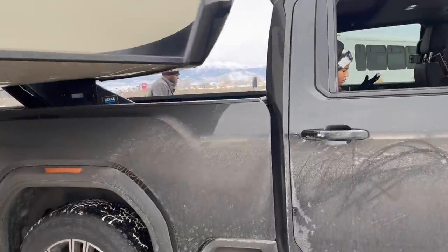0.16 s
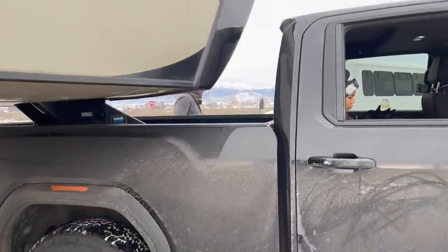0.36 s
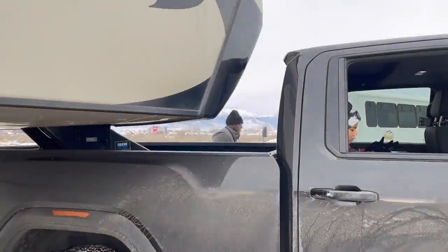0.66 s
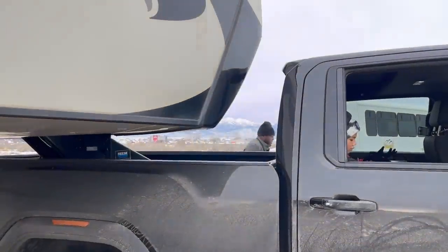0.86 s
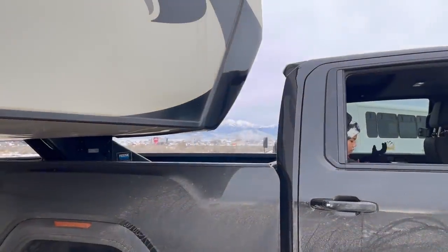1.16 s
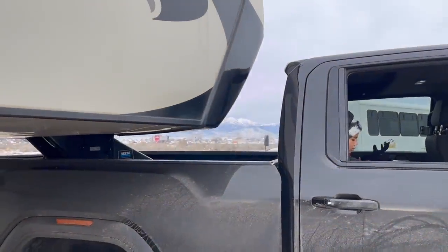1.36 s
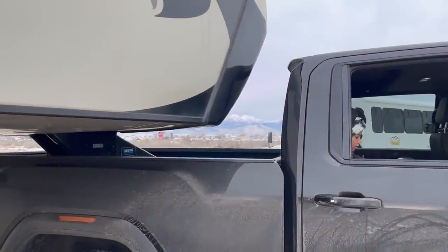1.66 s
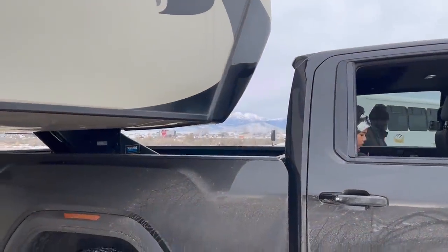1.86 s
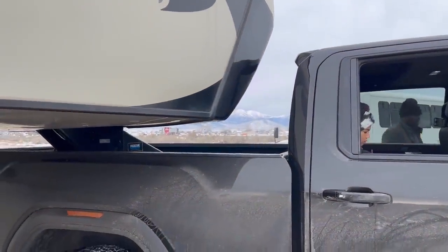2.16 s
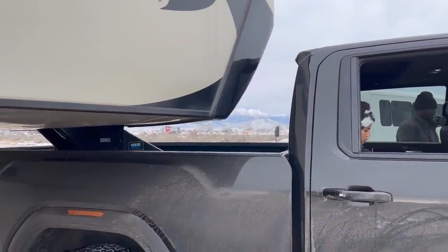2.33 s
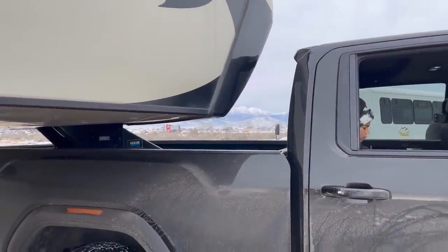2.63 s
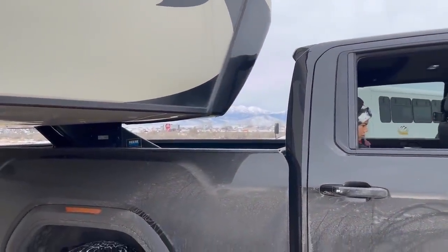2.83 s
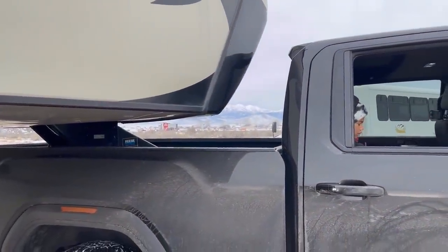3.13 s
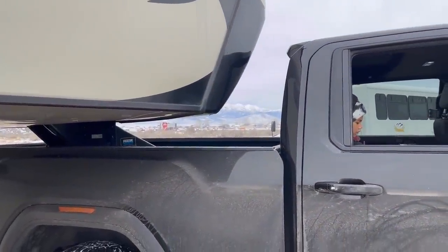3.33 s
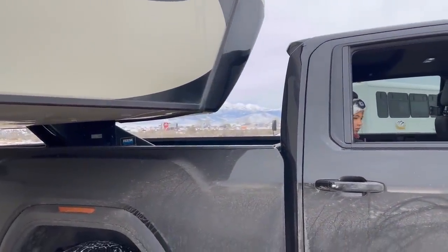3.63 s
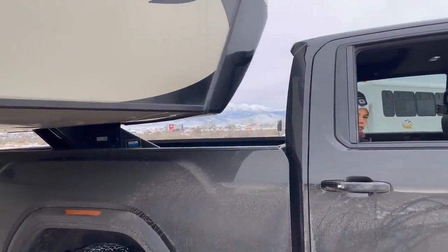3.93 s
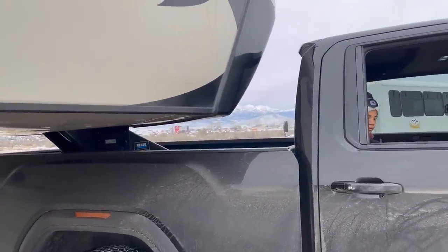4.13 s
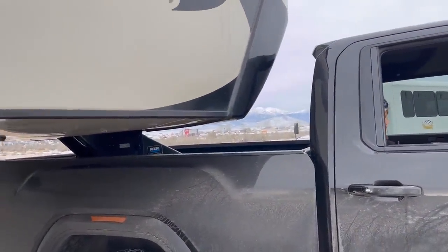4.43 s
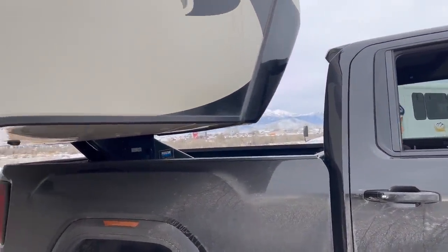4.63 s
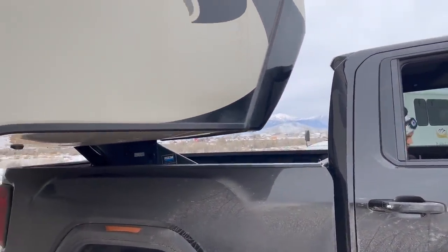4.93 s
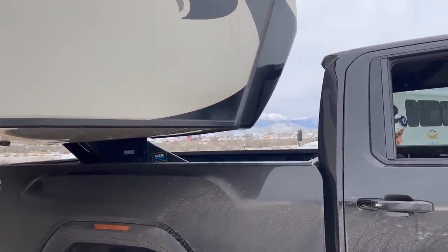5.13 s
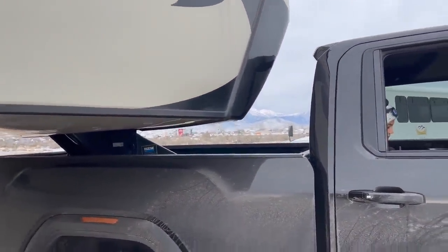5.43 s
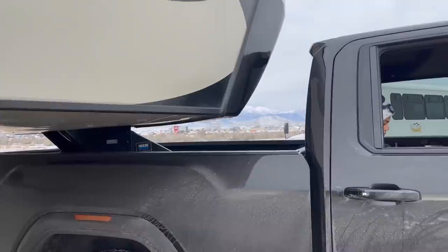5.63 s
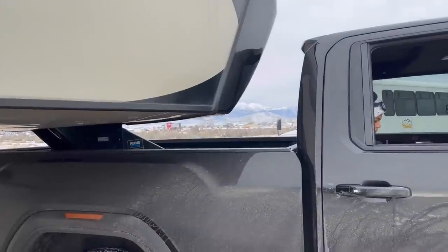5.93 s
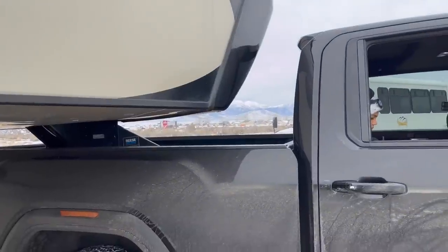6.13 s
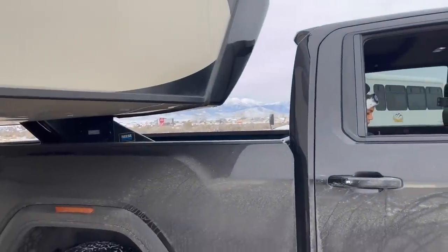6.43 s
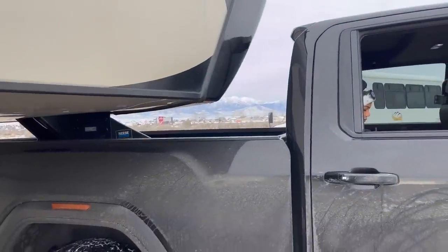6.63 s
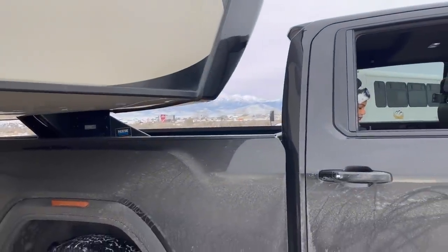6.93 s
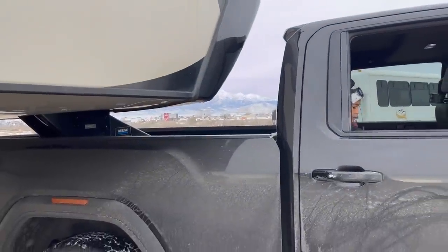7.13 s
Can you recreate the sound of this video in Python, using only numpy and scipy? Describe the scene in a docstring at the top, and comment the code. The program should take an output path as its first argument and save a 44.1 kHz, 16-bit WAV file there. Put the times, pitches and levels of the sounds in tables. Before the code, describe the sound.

A slow diesel idle fills the whole stretch, fluttering low exhaust pulses with gritty mechanical chatter, swelling very slightly. Soft airy hiss slides down at the start. Then a tight double clunk of the hitch, another hard clank, and a duller knock follow, each short, with a deep falling thump and rattle from the trailer. Tyres rub softly around the blows. A faint fuzzy whine grows late before a small gritty crack. Open air, close handheld stereo pickup.

```python
"""On a tight turn, close to a handheld camera: a V8 diesel pickup idles at 600 rpm and creeps round.
The exhaust is pulses ringing a pipe; the block clatters with noise and resonances swelled by each firing.
Tyres scrub as shaped noise; hitch blows ring steel and bed modes, and the trailer booms after them.
A stone snaps under a tyre; air hiss, a fuzzy whine and low hums lie behind. Two microphone ports hear it all."""
import sys
import numpy as np
from scipy import signal
from scipy.fft import rfft, irfft, next_fast_len
from scipy.io import wavfile
from scipy.ndimage import uniform_filter1d, map_coordinates

SR = 44100
rng = np.random.default_rng(int(sys.argv[2]) if len(sys.argv) > 2 else 0)


def log_audio(samples):
    """Write samples as a 16-bit WAV file to the path given in sys.argv[1]."""
    # one column per channel
    frames = np.atleast_2d(samples).T
    # limit to full scale, then quantise
    limited = np.clip(frames, -1, 1)
    pcm = np.round(limited * 32767).astype(np.int16)
    wavfile.write(sys.argv[1], SR, pcm)


N = 321048

# how far the crank trails a perfectly steady idle: (time [s], lag [ms])
CRANK_LAG = [(0, 5.5), (2.2, 8.7), (2.9, 10.7), (4, 10.1), (5.2, 12.6), (6.4, 12.7), (6.7, 16.3), (7.0, 24),
             (7.28, 33)]
# the eight firings of a cycle: (exhaust pulse size, combustion knock [dB], injector spit [dB])
CYLINDERS = [(3, -3, 4), (1.2, -3.5, -4), (0.66, -3, 6.5), (0.43, -44, 0.5), (1.85, -7, -9),
             (0.2, -4.5, 1.5), (1.56, -26, -6), (1.27, -2.5, 2)]
# exhaust pipe resonances: (frequency [Hz], width [Hz], level [dB])
PIPE_MODES = [(64.4, 4.2, -23), (78, 4.6, -34), (117.8, 11.3, 0), (401.7, 6.6, -5), (833, 9.5, -6),
              (1038, 17, -2.5)]
# clean exhaust tones: (multiple of the cycle rate, level [dB])
EXHAUST_TONES = [(8, -44.5), (11, -56), (19, -46.5), (21, -76), (22, -50.5)]
# colour of the exhaust rumble: (frequency [Hz], relative level [dB per Hz])
RUMBLE_COLOUR = [(22, -56), (35, -14), (62, -1), (100, -6.5), (150, -15), (230, -14), (330, -15),
                 (500, -22.5), (700, -66)]
# engine block resonances: (frequency [Hz], width [Hz], level [dB])
BLOCK_MODES = [(699, 20, -2.5), (829.5, 17, -2), (881, 39, 1.5), (974.4, 49, 4.5), (1055, 17, 5),
               (1254, 16, -7), (1412, 13.7, 3), (1591, 24, -0.5), (1762, 20, -14), (3915, 27, -11.5)]
# colour of the clatter: (frequency [Hz], relative level [dB per Hz])
CLATTER_COLOUR = [(400, -28), (600, 0.5), (900, -6), (1400, 4.5), (2000, -2.5), (2600, -6), (3300, -36)]
# colour of the upper clatter: (frequency [Hz], relative level [dB per Hz])
UPPER_COLOUR = [(2000, -2), (2800, 9), (3500, 4.5), (4200, -0.5), (4800, -6), (5500, -46)]
# colour of the hiss: (frequency [Hz], relative level [dB per Hz])
HISS_COLOUR = [(7500, -34), (8500, -1), (9500, 2.5), (11500, -1.5), (13800, -2.5), (14500, -13),
               (15600, -14)]
# tyres scrub harder while the truck moves: (time [s], level [dB])
TYRE_LEVEL = [(0, -60.5), (1.05, -63), (1.35, -55), (1.6, -61), (3.4, -61), (3.75, -56), (4.08, -50.5),
              (4.35, -58), (4.9, -56), (5.3, -61), (6.4, -67), (6.75, -56.5), (7.0, -58), (7.28, -69)]
# colour of the tyre scrub: (frequency [Hz], relative level [dB per Hz])
SCRUB_COLOUR = [(4200, -4.5), (5000, -0.5), (5800, -0.5), (6500, -7.5), (7300, -9.5), (8000, -8),
                (9000, -24)]
# a loose panel knocks at the same places of every cycle: (place [firings into the cycle], level [dB])
PANEL_KNOCKS = [(5.098, -37), (5.423, -44), (5.821, -38.5), (7.5, -39)]
# panel modes: (frequency [Hz], level [dB], t60 [s])
PANEL_MODES = [(212, 2, 0.088), (245.2, 3, 0.097), (271, -2, 0.037), (324, -9.5, 0.044)]
# hitch blows: (time [s], steel [dB, before a common gain of 1/3], steel rings from [Hz], up to [Hz],
# bed [dB], boom [dB], boom resting pitch [Hz], overtone [dB]); a soft blow has a lower upper edge
HITCH_BLOWS = [(3.198, -57, 602, 1450, -33, -52, 44.3, -46), (4.168, -19.5, 900, 4300, -28, -17, 42.4, -20),
               (4.1722, -14.5, 790, 2610, -11.5, -45, 46, -28),
               (4.196, -25, 650, 1900, -20.5, -32, 54, -16), (4.295, -54, 600, 1500, -37, -43, 55.4, -31),
               (4.375, -57, 600, 1500, -49, -35, 55.3, -31), (4.885, -9.5, 950, 2290, -15, -11, 54.5, -13),
               (4.908, -18.5, 900, 2300, -26, -18, 53.8, -36),
               (4.956, -50, 600, 1500, -41, -26.5, 53.5, -30), (5.007, -44, 600, 2400, -40, -41, 53, -47),
               (5.253, -21, 1250, 1160, -20.5, -35, 51.6, -23.5),
               (5.269, -15.5, 755, 700, -18, -18, 49.6, -32), (5.585, -55, 600, 1504, -33, -60, 54, -40)]
# hitch steel modes: (frequency [Hz], level [dB], t60 [s])
STEEL_MODES = [(517, 5, 0.11), (570, -4.5, 0.15), (671, -4, 0.22), (737, -0.5, 0.11), (817, 1, 0.11),
               (890, -0.5, 0.07), (963, 7.5, 0.082), (1060, 8.5, 0.048), (1156, -1, 0.13),
               (1250, 3.5, 0.059), (1587, 3.5, 0.065), (1753, -3.5, 0.094), (1950, 6.5, 0.043),
               (2250, -10, 0.041), (2610, -9, 0.038), (2590, -18, 0.089), (4020, -1.5, 0.05)]
# truck bed modes: (frequency [Hz], level [dB], t60 [s])
BED_MODES = [(205.8, 0.5, 0.13), (243.6, 6, 0.069), (277.2, 4, 0.067), (314, -8, 0.13), (363, -2.5, 0.091),
             (402.5, -9, 0.1)]
# colour of the trailer rattle: (frequency [Hz], relative level [dB per Hz])
RATTLE_COLOUR = [(30, -32), (60, -0.5), (120, 3), (250, -8.5), (400, -19.5), (700, -24), (1200, -26),
                 (2500, -53)]
# colour of the grit at the hitch: (frequency [Hz], relative level [dB per Hz])
GRIT_COLOUR = [(300, 15), (1500, 13.5), (4000, -1), (6500, -7), (8000, -14.5), (11000, -10), (14300, -30),
               (15600, -30)]
# a stone snaps under a tyre: (time [s], level [dB], t60 [s], ring against the crunch [dB])
STONE_SNAPS = [(7.1323, -31, 0.05, 1), (7.134, -30.5, 0.038, -6), (7.1377, -21.5, 0.017, -7),
               (7.142, -28.5, 0.15, -8)]
# colour of the stone crunch: (frequency [Hz], relative level [dB per Hz])
STONE_COLOUR = [(180, -17), (300, 4), (430, -10), (669, -0.5), (1940, -4.5), (2970, -12), (5900, -15.5),
                (8050, -27), (12700, -26), (15000, -53)]
# ring of the stone: (frequency [Hz], level [dB], t60 [s])
STONE_MODES = [(1650, 9, 0.02), (3780, -3, 0.018), (4210, -0.5, 0.022), (5720, 1, 0.023), (6430, -4, 0.022)]
# a low note sinks, then glides upward and fades, perhaps a far engine pulling away:
# (time [s], frequency [Hz], level [dB])
GLIDE = [(0, 67, -42), (.9, 63.7, -37), (1.22, 62, -58), (1.45, 62.8, -43), (1.75, 67.4, -41.5),
         (1.9, 68.1, -48), (2.2, 66.4, -41.5), (2.33, 71.6, -37), (2.5, 86, -50), (2.75, 97.7, -51),
         (3.4, 105.6, -47), (3.8, 113.5, -68), (4.05, 114.8, -76)]
# a low hum comes in after 2 s and wavers: (time [s], frequency [Hz], level [dB])
HUM = [(2.2, 63.74, -66), (2.5, 61.5, -44.5), (3.5, 61.9, -46), (4.1, 59.64, -38), (4.5, 62.3, -37),
       (4.8, 63, -44), (5.45, 59.7, -39.5), (5.7, 60.15, -34), (6.3, 61.4, -39), (6.65, 60.56, -37),
       (6.8, 64.3, -46), (7.1, 62.2, -37), (7.28, 63.3, -45)]
# likeness of the two ports for the truck: (frequency [Hz], likeness [0-1])
TRUCK_ALIKE = [(60, 0.94), (260, 0.94), (500, 0.27), (1000, 0.68), (1500, 0.7), (2000, 0.23), (2600, 0.027),
               (6000, 0.33), (8000, 0.85), (9500, 0.17), (11000, .99), (13000, 1), (14000, 0.21),
               (14600, 0.92)]
# phase between the ports for the truck: (frequency [Hz], left leads by [rad])
TRUCK_LEAD = [(0, 0), (400, -.6), (600, -2), (1300, -2.6), (1640, -3.3), (2240, -5.8), (2930, -10.3),
              (3960, -12.6), (4570, -12.4), (5430, -16.9), (6120, -13.6), (7670, -15.5), (10600, -18.7),
              (13300, -18.9), (14500, -22)]
# likeness of the two ports for the nearer hitch: (frequency [Hz], likeness [0-1])
HITCH_ALIKE = [(200, .98), (500, .9), (1300, .9), (2500, .6), (6000, .3), (11000, .9)]
# phase between the ports for the nearer hitch: (frequency [Hz], left leads by [rad])
HITCH_LEAD = [(0, 0), (900, -1.2), (1300, -2), (1900, -3.4), (2400, -5.3), (4000, -5.3), (7670, -15.5),
              (10600, -18.7), (13300, -18.9), (14500, -22)]
# level between the ports: (frequency [Hz], left over right [dB])
PORT_TILT = [(60, 1.5), (200, 1), (400, 2), (550, 0.5), (800, -4), (1000, 0), (1400, 4.5), (2000, 4),
             (2500, -4), (4400, 4), (7000, 2.5), (9500, -2.5), (11000, 0)]

FIRING_HZ, FIRING_SCATTER_DB = 40, 1.2
THROB_DB, RUMBLE_DB, RUMBLE_GROWS_DB_PER_S = -46, -44, 0.11
CLATTER_DB, CLATTER_GROWS_DB_PER_S = -44, 0.1963  # the engine comes slowly nearer
BLOCK_DB, UPPER_DB, VALVES_DB = -4, -9, -6  # against the clatter
# share of the noise power that comes back each cycle; radians a cycle that the pattern turns
REPEATS, UPPER_REPEATS, RUMBLE_REPEATS, DRIFT_PER_CYCLE = .68, .2, .3, .25
LUMPS_DB = 1.3  # rms of the random patches of gain
HISS_DB, HISS_DRIFT_DB = -65, 1.2  # steady engine hiss
SCRUB_HISS_DB = -9.5  # top end of the scrub against its body
BOOM_PEAK_S, RATTLE_DB, GRIT_DB = .049, -8, -13.5  # rattle against the overtone, grit against the steel
DULL_DB_PER_OCTAVE = -19.5  # outside the range that a contact rings
BED_CORNER = 0.41  # where a soft contact dulls the bed, as a share of the steel's upper edge
TWIN_RINGS = 1.1  # t60 of a twin mode against its fellow
AIR_DB, AIR_FROM_HZ, AIR_SLIDE_HZ_PER_S, AIR_PEAK_S, AIR_LASTS_S = -58, 4700, 510, 0.44, 0.57
WHINE_HZ, WHINE_FROM_DB, WHINE_TO_DB, WHINE_GROWS_S, WHINE_TAKES_S = 822, -52.5, -47, 5.56, 0.21
HUM_WAVER_DB = 1.5
TOP_HZ = 15590


def firings():
    """Crank position in firings since the start of the first cycle; the lag bends a steady idle."""
    lag_ms, = curves(CRANK_LAG)
    return FIRING_HZ * (np.arange(N) / SR - lag_ms / 1000) + 8


def exhaust(turn):
    """Uneven pulses of the two banks ring the pipe and hold clean tones over a rumble."""
    at, k = beats(turn, offset=.8)
    pulses = np.zeros(N)
    pulses[at] = -np.array(CYLINDERS)[(k + 1) % 8, 0] * amp(1.3 * rng.standard_normal(len(at)))
    throb = amp(THROB_DB) * unit(resonant(pulses, PIPE_MODES))
    throb += sum(amp(db) * np.sin(2 * np.pi * round(multiple) * turn / 8) for multiple, db in EXHAUST_TONES)
    rumble = rush(RUMBLE_COLOUR, amp(0.93 * wobble(11.0)), cyclic(turn, RUMBLE_REPEATS))
    rumble_db = RUMBLE_DB + RUMBLE_GROWS_DB_PER_S * np.arange(N) / SR
    return with_echoes(throb) + amp(rumble_db) * rumble


def raps_and_spits(turn):
    """Each firing gives one combustion knock and one injector spit, slightly scattered in size."""
    at, k = beats(turn, offset=0.707)
    hits = np.zeros((2, N))
    scatter = FIRING_SCATTER_DB * rng.standard_normal(len(at))
    hits[:, at] = amp(np.array(CYLINDERS)[(k + 1) % 8, 1:].T + scatter)
    return hits


def clatter(turn, knocks, spits):
    """Each firing raps the block and swells noise that partly returns every cycle."""
    body = rush(CLATTER_COLOUR, 0.4 + swell(knocks, decay=0.075), cyclic(turn, REPEATS))
    block = unit(resonant((2.6 + swell(knocks, decay=0.018)) * cyclic(turn, REPEATS), BLOCK_MODES))
    upper = rush(UPPER_COLOUR, 0.5 + swell(spits, decay=0.051), cyclic(turn, UPPER_REPEATS))
    return amp(nearness_db()) * (body + amp(BLOCK_DB) * block + amp(UPPER_DB) * upper)


def nearness_db():
    """Level of the clatter over time, as the engine comes nearer."""
    return CLATTER_DB + CLATTER_GROWS_DB_PER_S * np.arange(N) / SR


def valves(turn, count=64):
    """Valve and injector ticks come back at the same places of every cycle and ring the block."""
    ticks = np.zeros((2, N))
    # most follow a firing closely
    places = (np.arange(count) % 8 + .8 + rng.exponential(.25, count)) / 8 % 1
    for place, sign in zip(places, rng.choice([-1, 1], (count, 2))):
        at = beats(turn / 8, offset=place)[0]
        ticks[:, at] += sign[:, None] * amp(1.3 * rng.standard_normal(len(at)))
    broad = unit(filtered(ticks, lambda hz: amp(along(CLATTER_COLOUR, hz))))
    return amp(nearness_db() + VALVES_DB) * (unit(resonant(ticks, BLOCK_MODES)) + 0.24 * broad)


def scrub_and_hiss(spits):
    """Tyre scrub follows the truck's motion over a steady engine hiss; both noises swell with the spits."""
    scrub_db, = curves(TYRE_LEVEL)
    scrub = rush(SCRUB_COLOUR, (3.4 + swell(spits, decay=0.048)) * amp(0.3 * wobble(27.5)))
    flicker = amp(0.9 * wobble(25) + HISS_DRIFT_DB * wobble(rate=4.02))
    hiss = rush(HISS_COLOUR, (0.81 + swell(spits, decay=0.034)) * flicker)
    hiss_gain = np.hypot(amp(HISS_DB), amp(scrub_db + SCRUB_HISS_DB))
    return amp(scrub_db) * scrub + hiss_gain * hiss


def loose_panel(turn):
    """Four dull knocks in every engine cycle ring the panel's modes."""
    out = np.zeros(N + SR)
    for place, db in PANEL_KNOCKS:
        for i in beats(turn / 8, offset=place / 8)[0]:
            knock = ring(PANEL_MODES, rise=0.004, spread_db=1.5)
            out[i:i + SR // 2] += amp(db + rng.normal(0, 1.0)) * knock
    return with_echoes(out[:N])


def hitch():
    """A blow rings the steel and the bed and sends a falling boom and a rattle through the trailer."""
    out, rattle, grit = np.zeros((3, N + SR))
    for s, steel_db, from_hz, to_hz, bed_db, boom_db, boom_hz, over_db in HITCH_BLOWS:
        span = half_second(s)
        modes = [(hz, db + dull_db(hz / to_hz) + dull_db(from_hz / hz), t60) for hz, db, t60 in STEEL_MODES]
        # each steel mode has a close twin
        modes += [(1.015 * hz, db - 6, TWIN_RINGS * t60) for hz, db, t60 in modes]
        bed = [(hz, db + dull_db(hz / to_hz / BED_CORNER), t60) for hz, db, t60 in BED_MODES]
        out[span] += amp(steel_db) * ring(modes, rise=0.00074, spread_db=2.5, turns=0.94) / 3
        out[span] += amp(bed_db) * ring(bed, rise=0.005, spread_db=2.0)
        out[span] += boom(boom_hz, boom_db, BOOM_PEAK_S, start=3.27, t60=0.22)
        out[span] += boom(1.987 * boom_hz, over_db, 0.534 * BOOM_PEAK_S, start=1.73, t60=0.16)
        rattle[span] += amp(over_db + RATTLE_DB) * puff(t60=0.42, rise=0.0043)
        grit[span] += amp(steel_db + GRIT_DB) * puff(t60=0.13, rise=0.0084)
    shaking = rattle[:N] * rush(RATTLE_COLOUR, amp(2.0 * wobble(40)))
    grinding = grit[:N] * rush(GRIT_COLOUR, amp(2.3 * rng.standard_normal(N)))
    return with_echoes(out[:N]) + shaking + grinding


def dull_db(ratio):
    """Loss of a mode beyond a contact's edge, smooth around a ratio of 1."""
    return DULL_DB_PER_OCTAVE * np.log2(1 + ratio ** 4) / 4


def boom(hz, db, peak, start, t60):
    """A bending wave: its pitch falls from start times the resting pitch while it swells to a peak."""
    t = np.arange(SR // 2) / SR
    pitch = hz * (1 + (start - 1) * np.exp(-2.5 * t / peak))
    attack = 0.08 + 0.64 * np.sin(np.pi / 2 * t / peak) ** 2
    envelope = np.where(t < peak, attack, amp(-60 * (t - peak) / t60))
    return amp(db) * envelope * np.sin(2 * np.pi * np.cumsum(pitch) / SR)


def stone():
    """A stone cracks in steps: gritty bursts, each with a short bright ring."""
    snap, shards = np.zeros((2, N + SR))
    for s, db, t60, ring_db in STONE_SNAPS:
        span = half_second(s)
        snap[span] += amp(db) * puff(t60, rise=0.00044)
        shards[span] += amp(db + ring_db) * ring(STONE_MODES, rise=0.00056, spread_db=3.0, turns=1.0)
    crunch = rush(STONE_COLOUR, amp(6.0 * rng.standard_normal(N)))
    return snap[:N] * crunch + with_echoes(shards[:N])


def sliding_air():
    """A band of air hiss, slow noise on a falling carrier, slides down at the start."""
    t = np.arange(N) / SR
    slow = unit(filtered(rng.standard_normal((2, N)), lambda hz: 1 / (1 + (hz / 450) ** 4)))
    slide = np.sin(2 * np.pi * (AIR_FROM_HZ * t - AIR_SLIDE_HZ_PER_S * t * t / 2))
    envelope = np.exp(-((t - AIR_PEAK_S) / AIR_LASTS_S) ** 4)
    return amp(AIR_DB) * envelope * slow * amp(0.88 * wobble(11.0)) * slide


def whine():
    """A fuzzy whine, noise through one narrow resonance, grows near the end."""
    growth = 1 / (1 + np.exp((WHINE_GROWS_S - np.arange(N) / SR) / WHINE_TAKES_S))
    level_db = WHINE_FROM_DB + (WHINE_TO_DB - WHINE_FROM_DB) * growth
    return amp(level_db) * unit(resonant(rng.standard_normal((2, N)), [(WHINE_HZ, 11, 0)]))


def hums():
    """Two low tones apart from the idle: one glides, one wavers about its place."""
    def tone(hz, db):
        return amp(db + HUM_WAVER_DB * wobble(11)) * np.sin(2 * np.pi * np.cumsum(hz) / SR)
    return with_echoes(tone(*curves(GLIDE)) + tone(*curves(HUM)))


def with_echoes(x):
    """The direct sound paired with its scatter off ground and bodywork; long waves hardly scatter."""
    fade = amp(-60 * np.arange(SR // 10) / SR / .08)
    tail = rfft(rng.standard_normal(SR // 10) * fade)
    hz = np.fft.rfftfreq(SR // 10, 1 / SR)
    # keep only the tail's phases, so that the scatter has an even spectrum above the long waves
    even = np.sqrt(fade) * irfft(tail / np.abs(tail) * hz / (hz + 200))
    return np.array([x, signal.fftconvolve(x, even / np.linalg.norm(even))[:N]])


def ports(sound, lead, alike):
    """A source reaches two spaced microphone ports: partly alike, tilted and shifted by frequency."""
    def mix(hz):
        angle = np.arccos(np.clip(along(alike, hz), 0, 1)) / 2
        return np.array([np.cos(angle), np.sin(angle)])

    def skew(hz):
        return amp(along(PORT_TILT, hz) / 2) * np.exp(.5j * np.interp(hz, *np.transpose(lead)))
    shared, own = filtered(sound, mix)
    return filtered(np.array([shared + own, shared - own]), lambda hz: np.array([skew(hz), 1 / skew(hz)]))


def amp(db):
    """dB to gain."""
    return 10 ** (np.asarray(db) / 20)


def unit(x):
    """x at rms 1."""
    return x / np.sqrt(np.mean(x ** 2) + 1e-20)


def along(points, hz):
    """(frequency [Hz], value) points read on a log axis."""
    f, v = np.transpose(points)
    return np.interp(np.log(hz + 1), np.log(f + 1), v)


def curves(rows):
    """One value per sample for each column after the time."""
    s, *cols = np.transpose(rows)
    return [np.interp(np.arange(N) / SR, s, c) for c in cols]


def half_second(s):
    """The half second of samples from time s on."""
    return slice(round(s * SR), round(s * SR) + SR // 2)


def beats(count, offset):
    """Samples at which the count passes a whole number plus offset, and those numbers."""
    whole = np.floor(count - offset).astype(int)
    at = np.flatnonzero(np.diff(whole)) + 1
    return at, whole[at]


def wobble(rate):
    """A smooth random curve, rate knots a second."""
    return map_coordinates(rng.standard_normal(int(N * rate / SR) + 4), [np.arange(N) * rate / SR])


def filtered(x, response):
    """x times a complex response of frequency."""
    m = next_fast_len(N + SR // 2)
    return irfft(rfft(x, m) * response(np.fft.rfftfreq(m, 1 / SR)), m)[..., :N]


def resonant(x, modes):
    """x through causal resonances of (frequency [Hz], width [Hz], level [dB])."""
    def response(f):
        return sum(amp(db) * 1j * f * w / (c * c - f * f + 1j * f * w) for c, w, db in modes)
    return filtered(x, response)


def rush(colour, gate, noise=None):
    """Two gated noises of one colour, rms 1; fresh unrelated noises unless some are given."""
    noise = rng.standard_normal((2, N)) if noise is None else noise
    return unit(filtered(gate * noise, lambda hz: amp(along(colour, hz))))


def ring(modes, rise, spread_db, turns=0):
    """One blow on decaying modes that swell in over rise seconds, starting up to turns cycles apart."""
    t = np.arange(SR // 2) / SR
    tones = 0
    for hz, db, t60 in modes:
        decay = amp(db + rng.normal(0, spread_db) - 60 * t / t60)
        tones = tones + decay * np.sin(2 * np.pi * (hz * t + turns * rng.random()))
    return tones * (1 - np.exp(-(t / rise) ** 2))


def puff(t60, rise):
    """The envelope of a short burst."""
    t = np.arange(SR // 2) / SR
    return amp(-60 * t / t60) * (1 - np.exp(-t / rise))


def swell(hits, decay):
    """Each hit opens into a short envelope that decays with a t60 in seconds."""
    return signal.fftconvolve(hits, puff(decay, rise=0.0051)[:SR // 10])[:N]


def cyclic(turn, share):
    """Noise of which a share of the power returns every cycle, turning slowly between two patterns."""
    size = 8 * SR // FIRING_HZ
    a, b = rng.standard_normal((2, 2, size))[..., (turn / 8 * size).astype(int) % size]
    drift = DRIFT_PER_CYCLE * turn / 8
    pattern = np.cos(drift) * a + np.sin(drift) * b
    return np.sqrt(share) * pattern + np.sqrt(1 - share) * rng.standard_normal((2, N))


def lumpy(x):
    """x with patches of random gain in time and pitch, so that its lines waver and break up."""
    z = signal.stft(x, nperseg=1024)[2]
    field = uniform_filter1d(rng.standard_normal(z.shape[1:]), size=3, axis=0)
    field = uniform_filter1d(field, size=2, axis=1)
    return signal.istft(z * amp(LUMPS_DB * unit(field)), nperseg=1024)[1][:, :N]


def scene():
    """Engine and front tyre lie well to the right, the hitch nearer straight ahead."""
    turn = firings()
    knocks, spits = raps_and_spits(turn)
    engine = lumpy(clatter(turn, knocks, spits) + valves(turn) + scrub_and_hiss(spits))
    truck = exhaust(turn) + engine + loose_panel(turn) + stone()
    background = sliding_air() + whine() + hums()
    return ports(truck + background, TRUCK_LEAD, TRUCK_ALIKE) + ports(hitch(), HITCH_LEAD, HITCH_ALIKE)


def record(dry):
    """The camera keeps nothing above its band limit."""
    return filtered(dry, lambda hz: hz < TOP_HZ)


dry = scene()
out = record(dry)
log_audio(out)
```